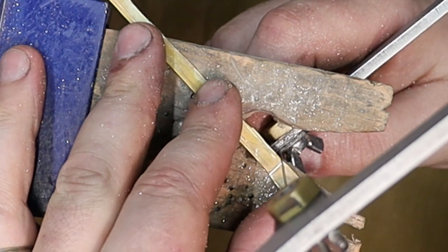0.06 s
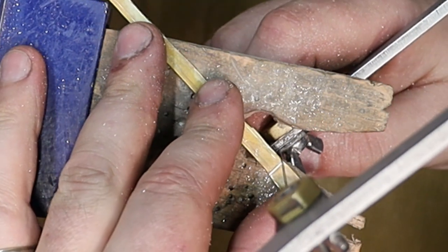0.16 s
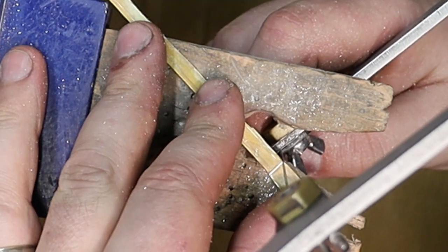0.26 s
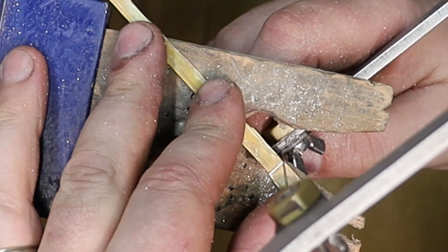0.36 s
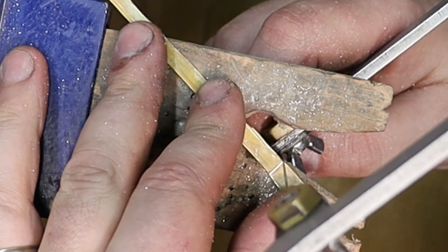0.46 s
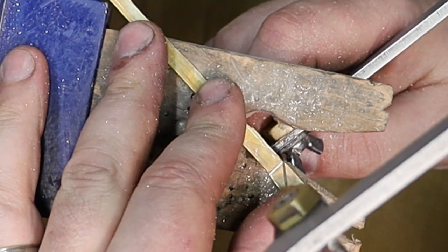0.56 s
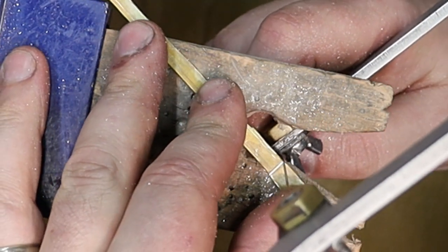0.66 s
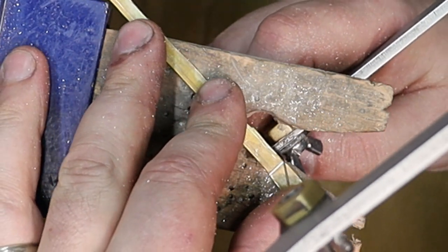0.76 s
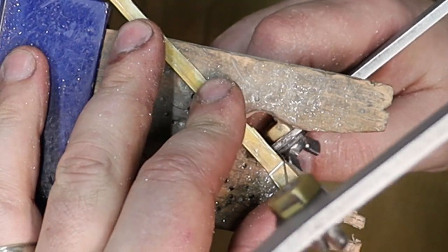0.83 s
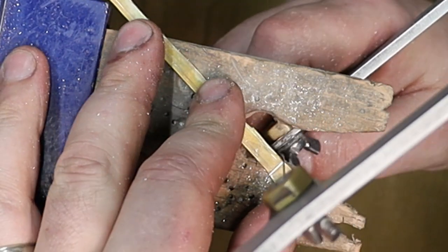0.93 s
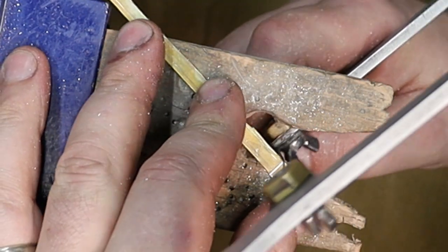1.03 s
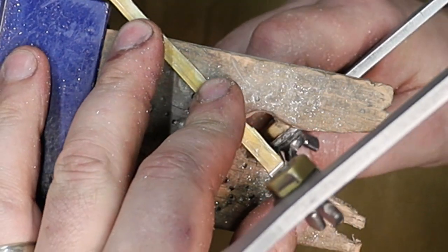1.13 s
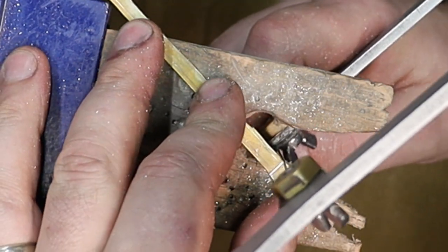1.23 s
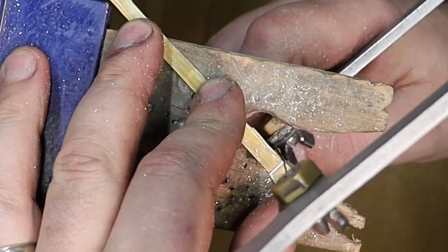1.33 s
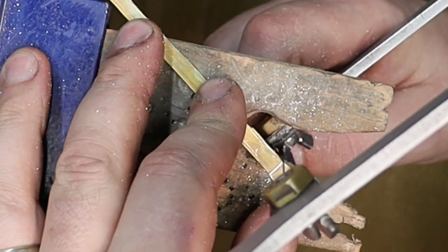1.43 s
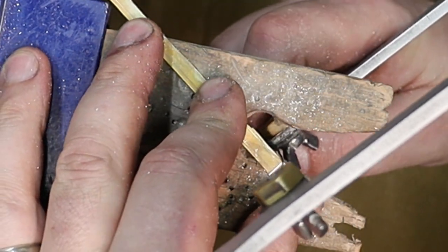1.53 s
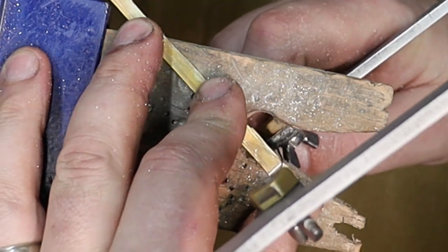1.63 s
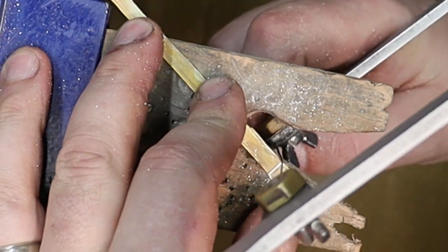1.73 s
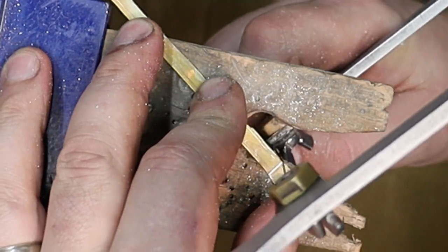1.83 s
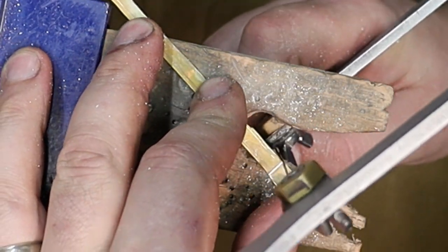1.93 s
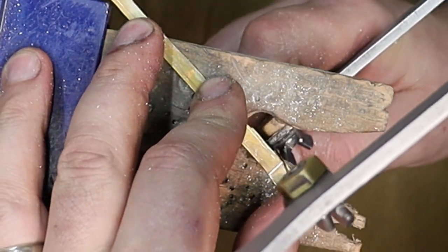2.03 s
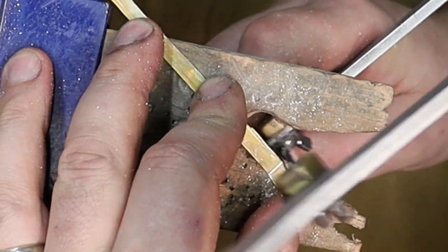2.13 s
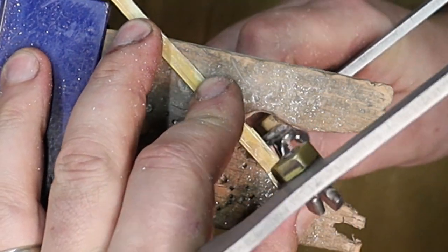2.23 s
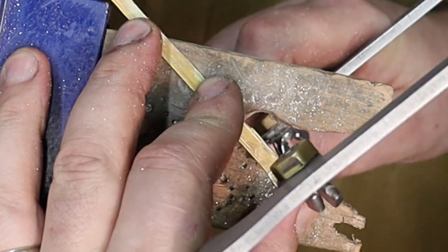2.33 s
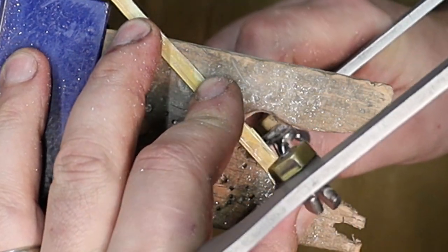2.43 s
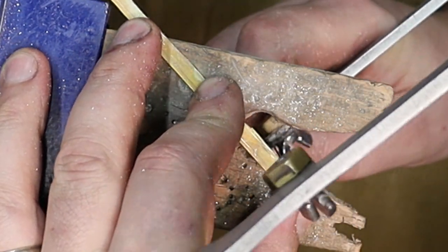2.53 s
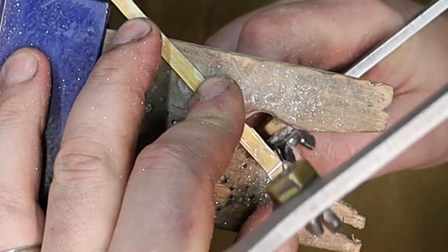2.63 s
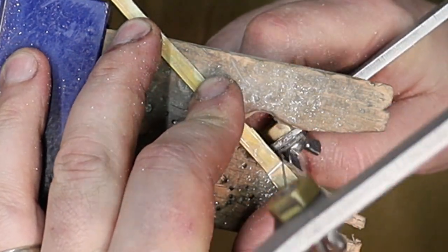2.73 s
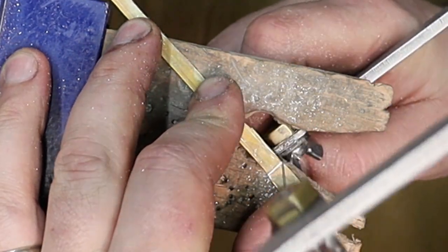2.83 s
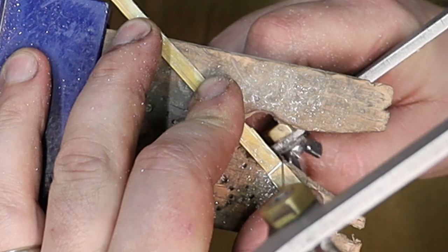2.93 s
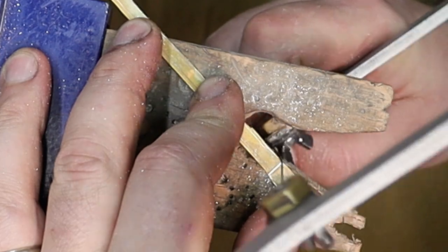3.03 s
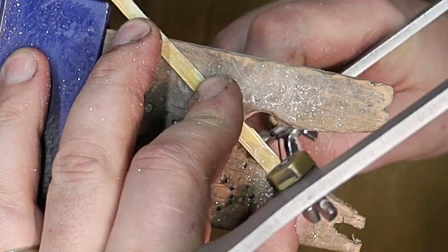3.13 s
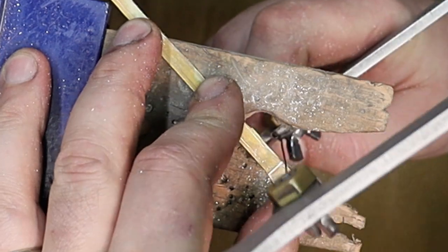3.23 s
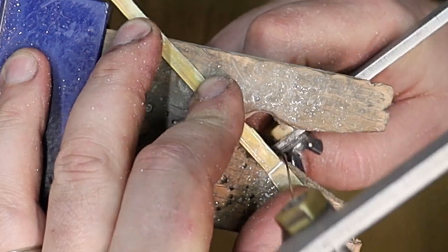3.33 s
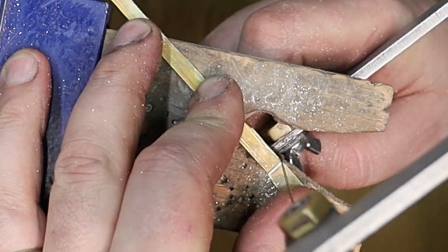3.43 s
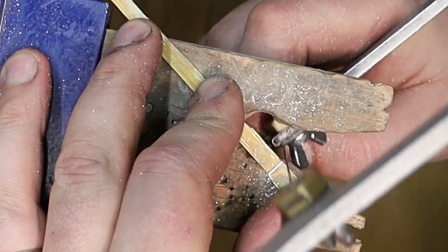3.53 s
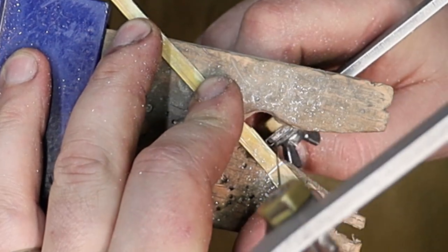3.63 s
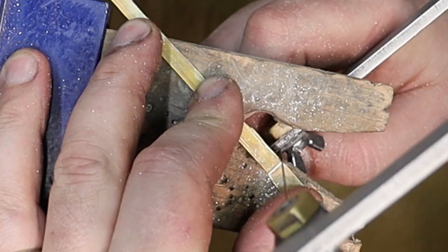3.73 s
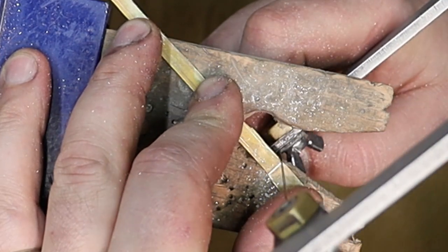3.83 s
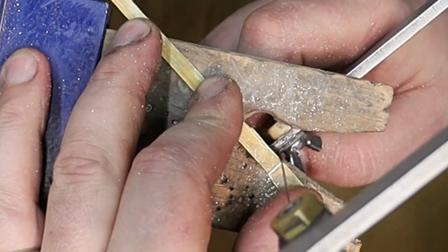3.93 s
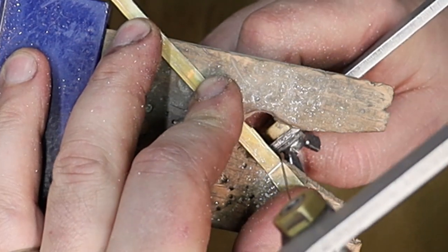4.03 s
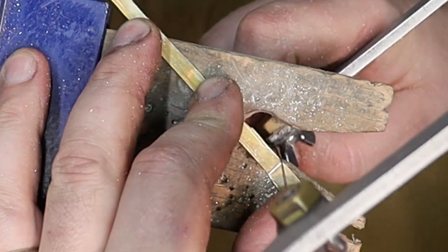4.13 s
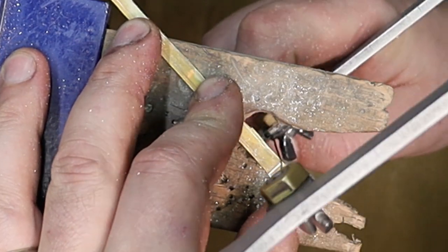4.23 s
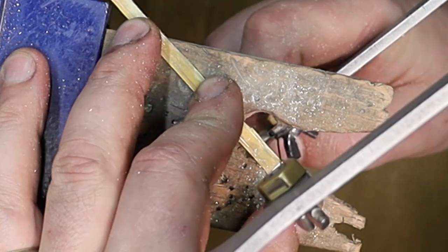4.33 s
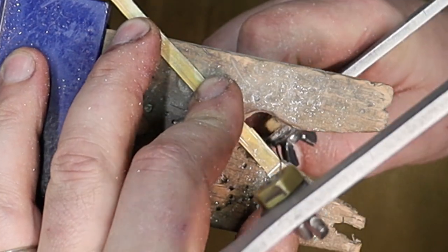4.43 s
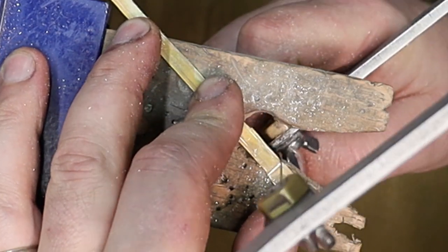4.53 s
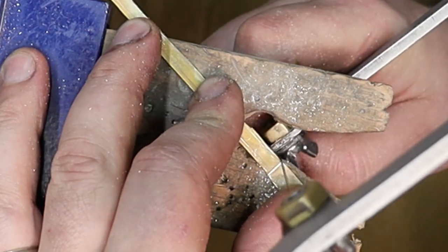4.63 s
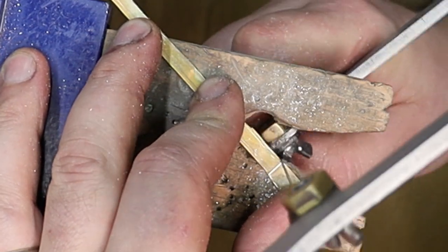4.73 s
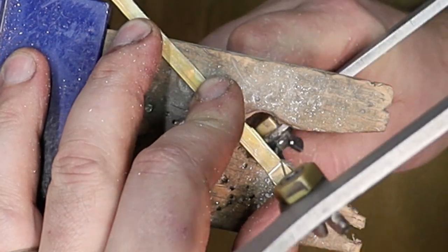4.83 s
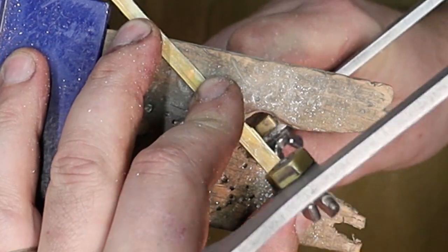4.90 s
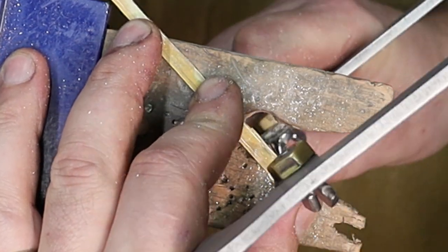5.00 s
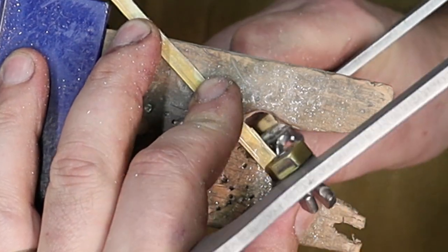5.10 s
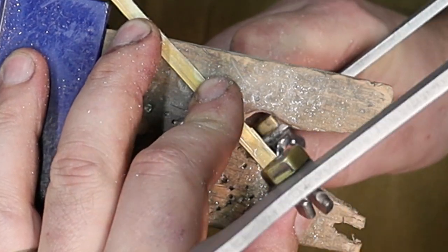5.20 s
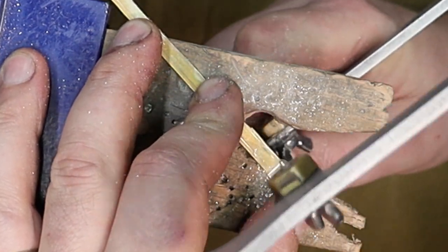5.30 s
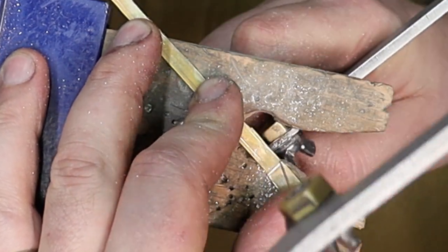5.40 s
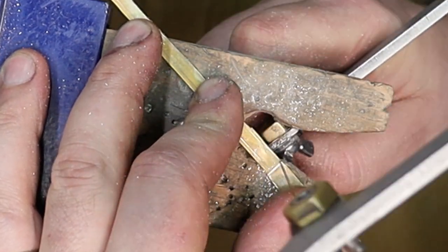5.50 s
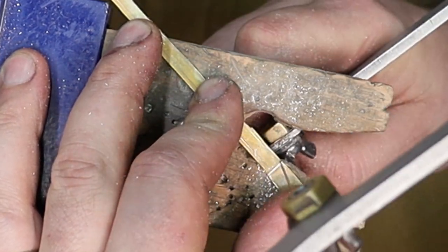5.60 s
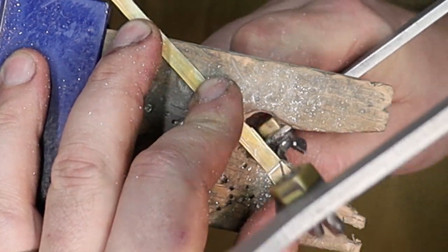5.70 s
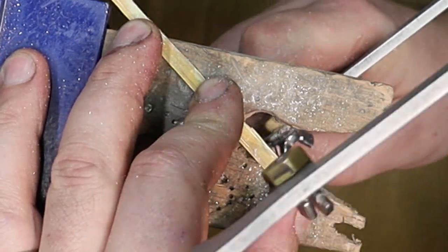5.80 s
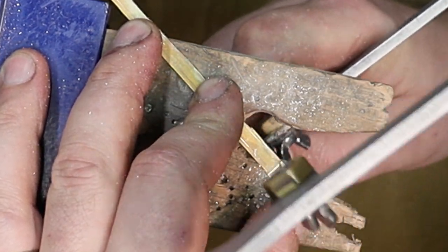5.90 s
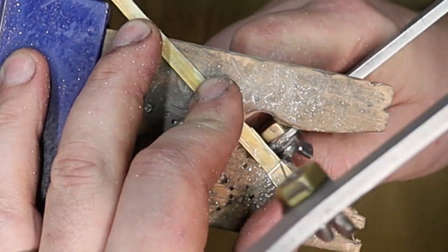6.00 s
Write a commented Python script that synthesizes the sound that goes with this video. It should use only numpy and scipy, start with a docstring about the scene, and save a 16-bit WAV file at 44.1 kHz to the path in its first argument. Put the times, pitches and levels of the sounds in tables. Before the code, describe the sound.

After light bench taps, a small saw blade grates back and forth through thin metal on wood, catching, bumping, pinging and clinking.

```python
"""Light taps on a bench open the scene, over room noise, wavering mains hum and a thin screen whine.
Then a fine saw blade rasps up and down through a brass strip on a wooden pin: each tooth is an impulse
that excites pin, strip and steel frame as filters, and snags and two bumps strike the same filters hard.
The slack blade slides softly after the first stroke; later the frame clinks as dying sines and the taut
blade pings as sums of dying modes, until the last strokes rasp to the end."""
import sys
import numpy as np
from scipy import signal
from scipy.io import wavfile
from scipy.ndimage import uniform_filter1d

SR = 44100
rng = np.random.default_rng(int(sys.argv[2]) if len(sys.argv) > 2 else 0)


def put_to_file(sound):
    """Save the sound as 16-bit audio at rate SR, in the file named by the first command-line argument."""
    columns = np.atleast_2d(sound).T  # one column per channel
    safe = np.clip(columns, -1, 1)
    whole_steps = np.round(safe * 32767)
    wavfile.write(sys.argv[1], SR, whole_steps.astype(np.int16))


N = 267069

# Strokes of the saw. Each row: start, attack, hold and release in s, thud of the pin in dB, lean over the hold
# in dB, top rate in teeth per s, time of the top in s, width of the rise and of the fall in s, then in dB
# relative to the pin: ring of strip and frame, hiss of the blade, rasp of the strip's edge, flex tone;
# unevenness 0-1, screw ticks in dB relative to the pin.
STROKES = [ (0.886, 0.035, .21, 0.091, -29, 9, 224, 0.18, .15, .06, -11, -15, -18.5, -6, 0.55, -15),
           (2.117, 0.04, 0.057, .01, -48.5, -2, 300, 0.078, .04, .04, -7, -17, -14, -16, 0.5, -25),
           (2.226, .012, 0.058, 0.098, -15.5, 1, 435, 0.066, .09, 0.059, -4.5, -15, -16.5, -17.5, 0.68, -15.5),
           (2.376, .03, 0.038, 0.052, -48, 1, 213, 0.011, .05, 0.057, -4, -22, -10, -1.5, 0.65, -28),
           (2.491, .12, 0.25, .015, -23, 5, 282, 0.28, 0.26, .12, -5.5, -20.5, -15, -34, 0.6, -22),
           (3.043, 0.042, .1, 0.08, -15, 0, 480, .11, .12, 0.061, -4, -15, -17, -11, 0.63, -16.5),
           (3.288, 0.072, 0.12, 0.025, -28.5, 0.5, 415, 0.12, 0.089, 0.075, -2, -18, -13, -43, 0.16, -22.5),
           (4.137, 0.074, 0.14, 0.071, -17.5, -0.5, 303, 0.14, .11, 0.097, -5, -14.5, -17, -15, 0.54, -19),
           (4.434, .09, 0.16, .1, -17.5, -2.5, 261, .15, 0.091, .12, -7.5, -22.5, -20.5, -18.5, .45, -19.5),
           (4.806, 0.034, 0.22, 0.083, -14.5, -7, 410, 0.089, 0.054, 0.039, -6.5, -14, -18.5, -12.5, 0.67, -15),
           (5.169, .09, 0.26, 0.047, -24.5, 0.5, 393, 0.25, 0.091, .085, -5.5, -21.5, -15.5, -23, 0.55, -22.5),
           (5.708, .06, .11, 0.083, -16.5, -6.5, 494, 0.085, .05, 0.068, -1.5, -12.5, -11.5, -7.5, 0.4, -12.5),
           (5.948, 0.045, 0.065, .01, -25.5, 4, 287, 0.12, .08, 0.09, -2.5, -20, -15, -48, 0.59, -24)]
# The blade snags and jerks free. Each row: start in s, peak in dB before SNAG_TRIM_DB, ring and hiss in dB
# relative to the pin, decay time t60 in s (at least 0.01).
SNAGS = [(0.892, -10, -11.5, -22, 0.14), (0.93, -7.5, -1, -27, 0.2), (0.989, -5, -5, -30, 0.066),
         (1.036, -6.5, -4.5, -31, 0.2), (1.091, 1, -14, -33, 0.032), (1.119, 0.5, -8, -14, 0.1),
         (1.129, -6, 14, -15, .039), (2.231, -4.5, -1, -8, 0.061), (2.573, -13.5, 1, -23, 0.075),
         (2.638, -5.5, 16, 2, 0.049), (2.786, 1.5, 0.5, -15.5, 0.046), (2.881, -3, -5.5, -10.5, 0.075),
         (3.051, -1, -1.5, -16, .094), (4.821, 3, 1, -18, 0.045), (4.859, 5, -1, -6.5, 0.041),
         (4.892, 0, -2, -19, .17), (5.047, -9.5, 0, -17, 0.045), (5.283, -4, 10, -18, 0.065),
         (5.33, -6.5, 9, -15, 0.091), (5.411, -25, 5, -12, .06), (5.761, -23, 6, -15, .08)]
# Light taps of fingers and tool on the bench. Each row: start in s, peak in dB, centre in Hz, t60 in s.
BENCH_TAPS = [(.099, -29.5, 2360, 0.03), (0.099, -26, 1290, 0.043), (.102, -41, 1300, 0.49),
              (.569, -40, 1470, 0.033), (1.542, -40, 900, 0.039), (1.879, -43, 2600, 0.04),
              (1.979, -37.5, 600, 0.031), (4.098, -36.5, 980, 0.085), (4.788, -27, 2940, 0.04),
              (5.156, -34.5, 775, 0.084), (5.197, -37, 2500, 0.04)]
# The blade springs loose. Each row: start in s, ring in dB, tilt in dB per octave,
# ring time as a factor, tick in dB.
PINGS = [(3.271, -35, -1, 0.43, -21.5), (3.491, -33, -3, 0.57, -21), (3.492, -28, -1.5, 0.61, -44),
         (3.585, -42, 0, 1.57, -24), (3.587, -31.5, -2, 0.62, -32), (3.722, -34, -1.5, 0.86, -27),
         (3.746, -36.5, -4.5, 1.3, -46), (3.834, -44.5, -4, 0.3, -39), (3.836, -46, -2.5, 1.2, -53)]
# Modes of the taut blade as a stiff string, two families free and one damped by the cut.
# Each row: the frequencies of one family in Hz.
MODES_HZ = [(1120, 2218, 3321, 4522, 5857, 7208, 7327, 10660, 13170),
            (1055, 2073, 3063, 4110, 6476, 7779, 9127, 10520, 12040, 13670),
            (1314, 2640, 4050, 4608, 5500, 7400, 9900, 11500)]
# Pitch of the same pings. Each row: family, tension as a factor on pitch, index of the mode that the cut mutes.
PING_PITCH = [(2, 1.15, 6), (0, 1.118, 3), (2, .997, 5), (0, 1, 0), (1, 1, 3), (2, 1.012, 3), (1, 1, 4),
              (0, 1.133, 4), (2, .995, 4)]
# The same modes in turn. Each row, one family: pairs of level in dB before tilt and muting,
# t60 in s before the ring-time factor.
MODE_DECAYS = [
    [(0, 0.68), (-4.5, 0.61), (1.5, 0.088), (1.5, 0.31), (-10, 0.48), (4.5, 0.18), (6, 0.064), (-6, 0.25),
     (-14, .15)],
    [(-27, 0.36), (-6, 0.29), (-20, 0.7), (-5, 0.08), (-24, 0.31), (-7, .32), (-8.5, 0.24), (-19, 0.2),
     (-13, 0.2), (-15, .14)],
    [(7, 0.15), (2.5, 0.14), (-1, 0.14), (-7, 0.12), (-12, 0.04), (4, 0.077), (-20, .04), (5, 0.058)],
]
# Thin chattering rings of frame and clamps. Each row: frequency in Hz, width in Hz, level in dB on the hiss
# before the chatter.
CHATTER_RINGS = [(2840, 160, 1), (6880, 240, -8.5), (7400, 290, -5), (8050, 190, -15), (10010, 60, -17),
                 (11770, 420, -17), (13300, 1000, -12)]
# Rings of the strip's free edge. Each row: frequency in Hz, width in Hz, level in dB on the rasp.
EDGE_RINGS = [(1275, 23, -5.5), (1454, 20, -25.5), (2536, 27, -11), (2790, 37, -21), (4657, 52, -4),
              (4875, 160, -6), (5120, 270, -7.5)]
# Spectral envelope of the sawn body. Each row: frequency in Hz, relative density in dB per Hz.
BODY_SPECTRUM = [(47, -64), (80, -38.5), (162, 1), (350, -2), (391, 2.5), (649, -3), (809, -6.5),
                 (1150, -17), (1500, -8), (1670, -19), (2130, -14.5), (5620, -29.5), (8000, -17),
                 (10700, -40.5), (15500, -47)]
# Resonances of pin, strip and frame. Each row: frequency in Hz, width in Hz, lift in dB.
BODY_RINGS = [(128.6, 8.8, 8.5), (440, 47, 5), (808.4, 22, 6.5), (982, 166, 9), (1298, 54, 8.5),
              (1528, 23, 8), (2210, 60, 4), (2460, 65, 6.5), (2794, 52, 9), (3260, 26, 4.5),
              (5830, 630, -4), (9030, 270, 16), (9850, 1100, -15), (12800, 1800, 9.5)]
# Spectral envelope of the room noise. Each row: frequency in Hz, relative density in dB per Hz.
ROOM_SPECTRUM = [(15, -43), (25, -23), (59, 0), (86, -18.5), (113, -1.5), (152, -13.5), (267, -11),
                 (313, -15.5), (349, -13), (523, -20.5), (1570, -29), (2920, -35), (3830, -37),
                 (13900, -41.5), (15500, -40)]
# Mains hum and screen whine. Each row: frequency in Hz, level in dB rms before the waver of the hum.
TONES = [(60, -53), (120, -58), (15681, -63.5)]
# The blade sticks for an instant: the cut dips, or briefly swells where positive.
# Each row: time in s, change in dB.
STICKS = [(1.011, -12), (1.058, -8), (2.869, 2), (4.282, -1), (4.953, -3.5), (5.272, 1), (5.311, -6.5),
          (5.367, -4)]
# The frame bumps the work in one hard blow. Each row: start in s, peak in dB.
BUMPS = [(1.0378, -8), (2.8835, 1)]
# Further loss for each dB under the hold. The entries: ring, hiss, rasp, tone and screw, in dB per dB.
DULLING = (.15, 0.2, 0.25, -0.26, 0.51)
# Tooth rates at which the pin flexes most. Each row: rate in Hz, width in Hz, lift in dB.
FLEX = [(250, 35, 9), (430, 72, 8)]
# Modes of a loose clamp screw. Each row: frequency in Hz, relative level in dB, t60 in s.
SCREW_MODES = [(7400, 10, 0.0044), (7860, 10, .011), (8800, -9, 0.011), (9570, -21, 0.056)]
# Single clinks of the steel frame. Each row: start in s, initial level in dB, frequency in Hz,
# t60 in s (at least 0.01).
CLINKS = [(2.587, -35, 6690, .06), (2.644, -23.5, 7540, .04), (3.179, -36, 8100, 0.035),
          (4.204, -39, 7900, 0.042), (4.663, -23, 8030, .025), (5.454, -33, 6650, .05),
          (5.456, -47, 9900, .06), (5.503, -45, 9940, 0.17), (5.514, -29.5, 8040, 0.057),
          (5.524, -39.5, 7700, .15), (5.761, -18.5, 6500, .05), (5.965, -45, 6760, 0.1)]
# The back of the blade slides lightly through the cut. Each row: start in s, length in s, level in dB.
SLIDES = [(1.202, 0.41, -59), (2.1, .13, -67)]
# Rings of the slack blade. Each row: frequency in Hz, width in Hz, level in dB.
SLIDE_RINGS = [(1260, 220, 1), (2170, 220, 7), (3300, 900, -22), (4670, 270, -21)]

REST_DB, ATTACK_BEND, RELEASE_BEND = -27.5, 1.3, 0.73  # level where ramps meet rest; exponents of the ramps
SLOW_PER_S = 150  # teeth per s where the hand turns, before wobble
STICK_S = 0.016  # time from the centre of a stick to 1/e of its dB
WOBBLE, WOBBLE_S, FLUTTER_DB = .12, .025, 7.5  # speed share, smoothing time, tone flutter; scaled by unevenness
BROAD_HISS_DB = -7.5  # broad part of the hiss against its thin rings
PATCHY_DB = 3  # each ring of the edge swells and fades on its own
SCREW_PER_S, SCREW_BUSY, SCREW_BURST_S = 115, .55, .035  # mean tick rate, share of time ticking, burst length
SNAG_BLOW, SNAG_TRIM_DB = 2.46, -8.0  # first blow in the drive; trim of all snags
BUZZ, BUZZ_S, BUZZ_HZ = 1.3, 0.017, 175  # buzz as a ping starts: depth, decay time, bandwidth
ROOM_DB, ECHO_DB = -45.5, -19.0
EDGE_HZ = 16000  # upper band limit


def strokes(parts):
    """Forced vibration: tooth impulses flex the pin in step and drive its filters; higher parts get more grit."""
    out = np.zeros(N)
    for s, attack_s, hold_s, release_s, thud_db, lean_db, *swing, ring, hiss, rasp, flex, uneven, ticking in STROKES:
        t = np.arange(0, attack_s + hold_s + 1.5 * release_s, 1 / SR)
        under_db, lean, per_s = motion(t, attack_s, hold_s, release_s, lean_db, *swing)
        pin_db = thud_db + lean + under_db
        # lighter pressure also changes the balance of the layers
        relative = zip((ring, hiss, rasp, flex, ticking), DULLING)
        ring_db, hiss_db, rasp_db, tone_db, screw_db = (rel_db + loss * under_db for rel_db, loss in relative)
        flex_db = sum(lift_db / (1 + (2 * (per_s - f) / w) ** 2) for f, w, lift_db in FLEX)
        uneven = np.clip(uneven, 0, 1)
        wobbled_per_s = per_s * (1 + WOBBLE * uneven * wobble(len(t)))
        knocks, tone, grits = teeth(wobbled_per_s, uneven)
        tone_db = pin_db + tone_db + flex_db + FLUTTER_DB * uneven * wobble(len(t))
        fade = signal.windows.tukey(len(t), .03) * grip(s + t)

        add(out, s, amp(tone_db) * tone * fade)
        add(out, s, amp(pin_db + rasp_db) * fade * edge(grits[1]))
        hiss_drive = (grits[2] + 0.52 * knocks) * amp(pin_db + hiss_db) * fade
        add(out, s, chatter(hiss_drive))
        ticks, tick = screw(len(t))
        add(out, s, signal.oaconvolve(ticks * amp(pin_db + screw_db) * fade, tick))

        levels_db = (pin_db - 0.5, pin_db + ring_db, pin_db + hiss_db + BROAD_HISS_DB)
        for response, level_db, more_grit, grit in zip(parts, levels_db, (.1, .3, .6), grits):
            share = np.clip(uneven + more_grit, 0, 1)
            drive = np.sqrt(1 - share) * knocks + np.sqrt(share) * grit
            add(out, s, signal.oaconvolve(drive * amp(level_db) * fade, response))
    return out


def motion(t, attack_s, hold_s, release_s, lean_db, top_per_s, top_s, rise_s, fall_s):
    """Kinematics of a stroke: pressure ramps up, leans and lets go; speed swings up to a top and back."""
    before = np.clip(1 - t / attack_s, 0, 1) ** ATTACK_BEND
    after = np.clip((t - attack_s - hold_s) / release_s, 0, 1.5) ** RELEASE_BEND
    lean = lean_db * np.clip((t - attack_s) / hold_s, 0, 1)
    width_s = np.where(t < top_s, rise_s, fall_s)
    per_s = SLOW_PER_S + (top_per_s - SLOW_PER_S) * np.exp(-((t - top_s) / width_s) ** 2)
    return REST_DB * (before + after), lean, per_s


def grip(t):
    """Stick-slip friction: the gain of the cut changes briefly around each stick."""
    return amp(sum(db * np.exp(-((t - s) / STICK_S) ** 2) for s, db in STICKS))


def teeth(per_s, uneven, spread_db=4, wander=.06, grit_per_s=9000, grit_db=3):
    """Impulse train of uneven passing teeth, the tone at their rate, and swarf grit bunched after each."""
    n = len(per_s)
    drift = evened(uniform_filter1d(rng.standard_normal(n), size=150))
    turns = np.cumsum(per_s * (1 + wander * uneven * drift)) / SR
    hits = np.diff(np.floor(turns), prepend=0) > 0
    knocks = hits * amp(spread_db * uneven * rng.standard_normal(n)) * np.sqrt(SR / per_s)
    tone = np.sqrt(2) * np.cos(2 * np.pi * turns)
    size = amp(grit_db * np.minimum(rng.exponential(1, (3, n)), 4))
    chips = (rng.random((3, n)) < grit_per_s / SR) * rng.standard_normal((3, n)) * size
    chips = chips + .5 * chips[1]  # the middle part's chips are heard through every part
    grit = evened(chips * (.5 + np.exp(-(turns % 1) / .4)))
    return evened(knocks), tone, grit


def edge(grit):
    """Resonance of an overhang: grit rings the strip's free edge."""
    out = 0
    for hz, width, db in EDGE_RINGS:
        ringing = evened(signal.lfilter(*signal.iirpeak(hz, hz / width, SR), grit))
        out = out + amp(db + PATCHY_DB * wobble(len(grit))) * ringing
    return out


def chatter(drive, depth_db=6):
    """Intermittent contact: the drive of each resonance steps to a chance level every 27 ms."""
    out, drive = 0, np.pad(drive, (0, 3000))  # room to ring out
    for hz, width, db in CHATTER_RINGS:
        contact = np.repeat(rng.standard_normal(len(drive) // 1200 + 1), 1200)[:len(drive)]
        contact = uniform_filter1d(np.clip(contact, -1.5, 1.3), size=100)
        b, a = signal.iirpeak(hz, hz / width, SR)
        gain = amp(db + depth_db * (contact - 1)) * np.sqrt(SR / np.pi / width)
        out = out + signal.lfilter(b, a, drive * gain)
    return out


def screw(n):
    """Modal impulse response of a loose screw, with uneven ticks in bursts to excite it."""
    drift = evened(uniform_filter1d(rng.standard_normal(n), size=300))
    turns = np.cumsum(SCREW_PER_S * (1 + .5 * drift)) / SR
    ticks = np.diff(np.floor(turns), prepend=0) > 0
    slot = max(round(SCREW_BURST_S * SR), 1)
    busy = np.repeat(rng.random(200) < SCREW_BUSY, slot)[:n]
    t = np.arange(2500) / SR
    tick = sum(amp(db - 60 * t / t60) * np.sin(2 * np.pi * hz * t) for hz, db, t60 in SCREW_MODES)
    tick = tick * (1 - np.exp(-t / 0.0003))
    sized_ticks = ticks * busy * amp(2.3 * rng.standard_normal(n))
    return sized_ticks, tick * np.sqrt(SR / SCREW_PER_S) / np.linalg.norm(tick)


def wobble(n):
    """Low-passed chance: noise averaged twice, with an rms of one."""
    slow = uniform_filter1d(rng.standard_normal(n), max(round(WOBBLE_S * SR), 1))
    return evened(uniform_filter1d(slow, max(round(WOBBLE_S * SR / 2), 1)))


def body():
    """Minimum-phase impulse responses of pin (low), strip and frame (middle) and blade (high)."""
    hz = np.fft.rfftfreq(8192, 1 / SR)
    lift = sum(lift_db / (1 + (2 * (hz - f) / w) ** 2) for f, w, lift_db in BODY_RINGS)
    db = read(BODY_SPECTRUM, hz) + lift
    low, high = 1 / (1 + (hz / 1150) ** 8), 1 / (1 + (5500 / (hz + 1)) ** 8)
    parts = []
    for share in (low, 1 - low - high, high):
        log_gain = np.log(np.maximum(amp(db) * np.sqrt(abs(share)), 1e-5))
        circle = np.concatenate([log_gain, log_gain[-2:0:-1]])
        # the Hilbert transform of the log gain gives the phase of a causal response
        response = np.fft.ifft(np.exp(np.conj(signal.hilbert(circle)))).real[:4096]
        parts.append(response / np.linalg.norm(response))
    return parts


def snags(parts):
    """Impact excitation: a hard blow and a dying rattle into the same body."""
    out, t = np.zeros(N), np.arange(5000) / SR
    for s, db, ring_db, hiss_db, t60 in SNAGS:
        decay = amp(-60 * t / max(t60, .01))
        rattle = rng.standard_normal(len(t)) * decay * (1 - np.exp(-t / 0.0024)) * 0.71
        rattle[0] = SNAG_BLOW
        levels_db = (0, ring_db, hiss_db)
        sound = sum(amp(g_db) * signal.oaconvolve(rattle, p) for p, g_db in zip(parts, levels_db))
        add(out, s, amp(db + SNAG_TRIM_DB) * sound / abs(sound).max())
    return out


def bumps(parts):
    """Impulse response: a single blow rings pin, strip with frame, and blade together."""
    out, sound = np.zeros(N), parts[0] + amp(-12.0) * parts[1] + amp(-25.5) * parts[2]
    for s, db in BUMPS:
        add(out, s, amp(db) * sound / abs(sound).max())
    return out


def pings():
    """Free vibration: the loosed blade ticks against the cut and rings."""
    out, t = np.zeros(N), np.arange(SR // 2) / SR
    rise = 1 - np.exp(-t / .003)
    for (s, db, tilt_db, lasting, tick_db), pitch in zip(PINGS, PING_PITCH):
        tick = amp(tick_db - 60 * t / .03) * rng.standard_normal(len(t))
        add(out, s, rise * (amp(db) * blade_modes(*pitch, tilt_db, lasting, t) + tick))
    return out


def blade_modes(family, tension, muted, tilt_db, lasting, t):
    """Modal superposition: dying sines of random phase, each buzzing roughly at its start."""
    hz = np.array(MODES_HZ[family])[:, None]
    db, t60 = np.transpose(MODE_DECAYS[family])[:, :, None]
    level_db = db + tilt_db * np.log2(hz / 2000) - 60 * t / (t60 * lasting)
    level_db[muted] -= 15
    noise = rng.standard_normal(level_db.shape)
    rough = evened(signal.lfilter(*signal.butter(2, BUZZ_HZ, fs=SR), noise))
    buzz = 1 + BUZZ * np.exp(-t / BUZZ_S) * rough
    sines = np.sin(2 * np.pi * (hz * tension * t + rng.random(hz.shape)))
    return (amp(level_db) * buzz * sines).sum(0)


def clinks():
    """Damped oscillation: each clink of the frame is one dying sine."""
    out, t = np.zeros(N), np.arange(8000) / SR
    for s, db, hz, t60 in CLINKS:
        add(out, s, amp(db - 60 * t / max(t60, .01)) * np.sin(2 * np.pi * hz * t))
    return out


def slides():
    """Friction noise: a soft swell of noise excites the rings of the slack blade."""
    out = np.zeros(N)
    for s, length, db in SLIDES:
        noise = rng.standard_normal(SR // 2)
        sound = 0
        for hz, width, ring_db in SLIDE_RINGS:
            ringing = evened(signal.lfilter(*signal.iirpeak(hz, hz / width, SR), noise))
            sound = sound + amp(ring_db) * ringing
        progress = np.clip(np.arange(len(noise)) / SR / length, 0, 1)
        swell = np.sin(np.pi * progress ** 0.56) ** 2
        add(out, s, amp(db) * sound * swell)
    return out


def taps():
    """Band-pass transmission: a short noise burst through the broad band that the bench passes on."""
    out, t = np.zeros(N), np.arange(4000) / SR
    for s, db, hz, t60 in BENCH_TAPS:
        burst = rng.standard_normal(len(t)) * amp(-60 * t / max(t60, .01)) * (1 - np.exp(-t / .001))
        band = signal.butter(2, (hz * .75, hz * 1.25), "band", fs=SR, output="sos")
        sound = signal.sosfilt(band, burst) + 0.01 * burst
        add(out, s, amp(db) * sound / abs(sound).max())
    return out


def walls(x, t60=0.31):
    """Reverberation: sparse echoes of random sign die away exponentially, dulled by a low-pass."""
    at = np.arange(300, SR // 2, 22)
    echoes = np.zeros(SR // 2 + 22)
    signs = rng.choice([-1., 1.], len(at))
    echoes[at + rng.integers(0, 22, len(at))] = signs * amp(-60 * at / SR / t60)
    echoes = signal.lfilter([1], [1, -.6], echoes)
    return signal.oaconvolve(x, echoes / np.linalg.norm(echoes))[:N]


def workshop():
    """Stationary noise of a shaped spectrum, with mains hum and screen whine as sines."""
    frames, hz = N // 1024 + 6, np.fft.rfftfreq(4096, 1 / SR)
    a, b = rng.standard_normal((frames, 2049, 2)).T
    spectra = (a + 1j * b) * amp(read(ROOM_SPECTRUM, hz))[:, None]
    noise = signal.istft(spectra, nperseg=4096, noverlap=3072)[1][:N]
    t = np.arange(N) / SR
    waver = 1 + 0.25 * np.sin(2 * np.pi * (9.3 * t + 2 * np.sin(2 * np.pi * 4.6 * t)))
    tones = 0
    for f, db in TONES:
        swing = waver if f < 1000 else 1  # the hum wavers, the whine is steady
        tones = tones + swing * np.sqrt(2) * amp(db) * np.sin(2 * np.pi * f * t)
    return amp(ROOM_DB) * evened(noise) + tones


def amp(db):
    """Logarithmic level: decibels to gain."""
    return 10 ** (np.asarray(db) / 20)


def evened(x):
    """Normalisation to an rms of one."""
    return x / np.sqrt(np.mean(x ** 2) + 1e-20)


def read(points, hz):
    """Interpolation of a spectrum table on a log-frequency axis."""
    f, value = np.transpose(points)
    return np.interp(np.log(hz + 1), np.log(f + 1), value)


def add(mix, s, sound):
    """Superposition: adds a sound to the mix from a time in seconds."""
    part = mix[round(s * SR):][:len(sound)]
    part += sound[:len(part)]


def scene():
    """Superposition of the direct sound of the saw, its weak echoes and the workshop."""
    parts = body()
    saw = strokes(parts) + snags(parts) + bumps(parts) + taps() + pings() + clinks() + slides()
    return (saw + amp(ECHO_DB) * walls(saw) + workshop())[None]


def record(dry):
    """Saturation and band limit: peaks beyond full scale clip, then a low-pass follows."""
    clipped = np.clip(dry, -1, 1)
    low_pass = signal.firwin(511, EDGE_HZ, window=("kaiser", 9), fs=SR)
    return signal.oaconvolve(clipped, low_pass[None], "same")


dry = scene()
out = record(dry)
put_to_file(out)
```